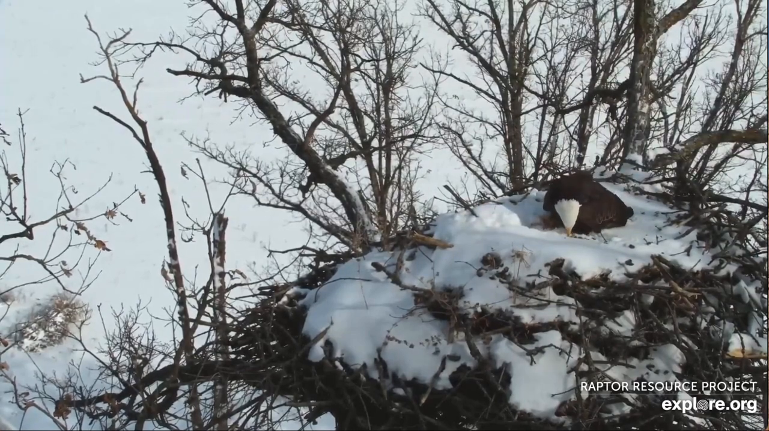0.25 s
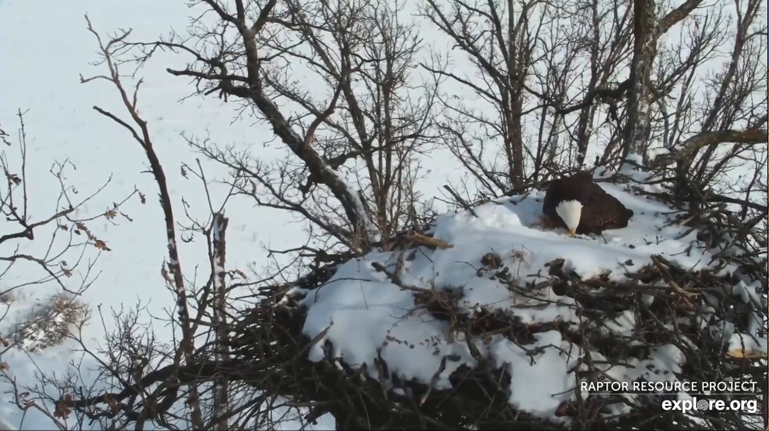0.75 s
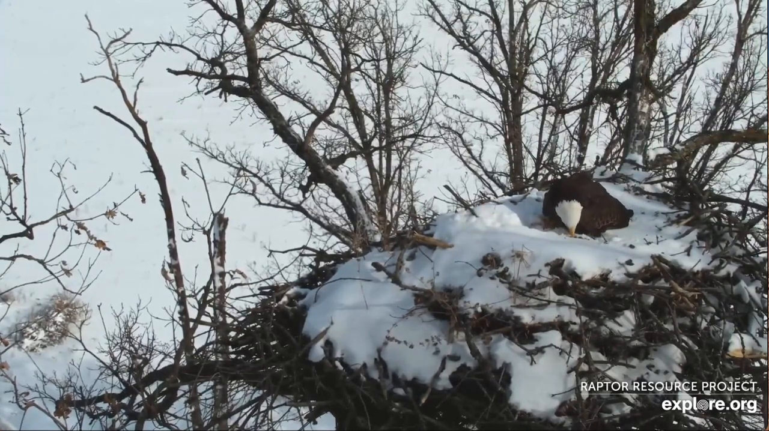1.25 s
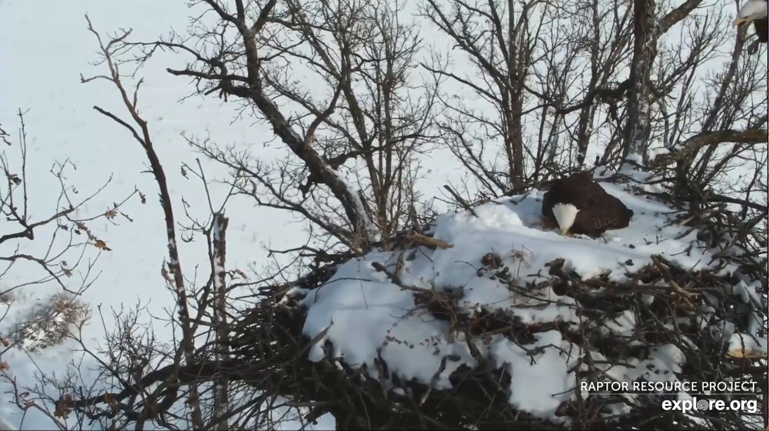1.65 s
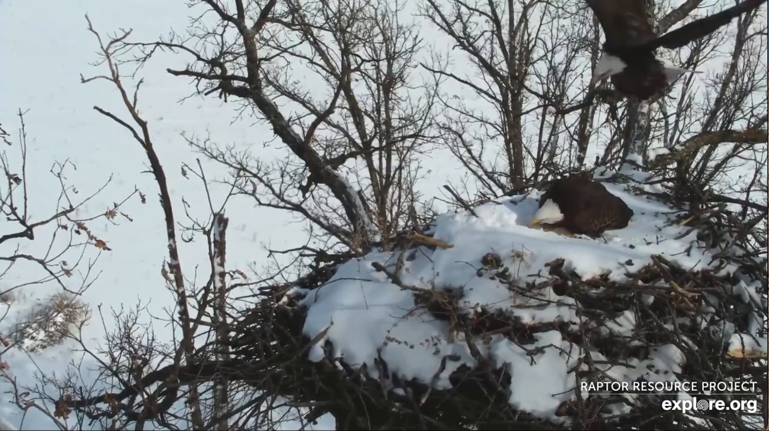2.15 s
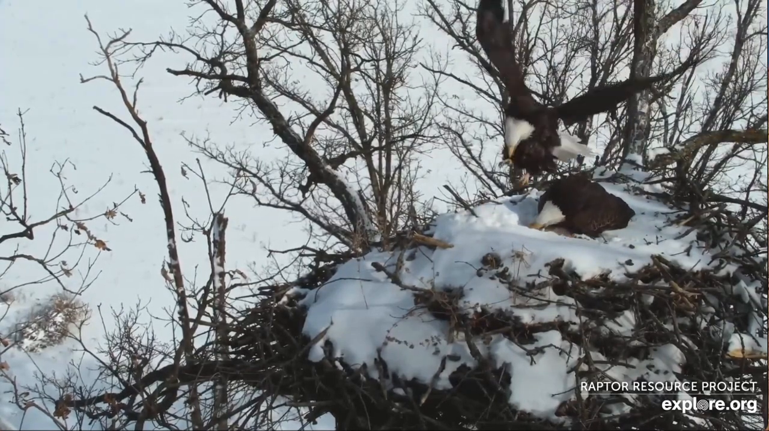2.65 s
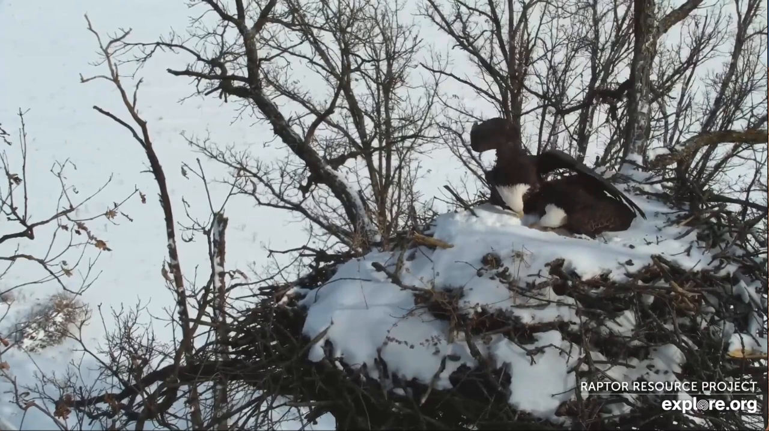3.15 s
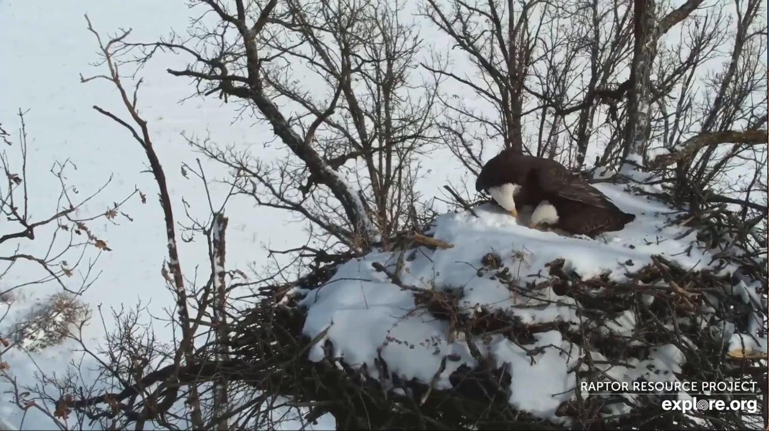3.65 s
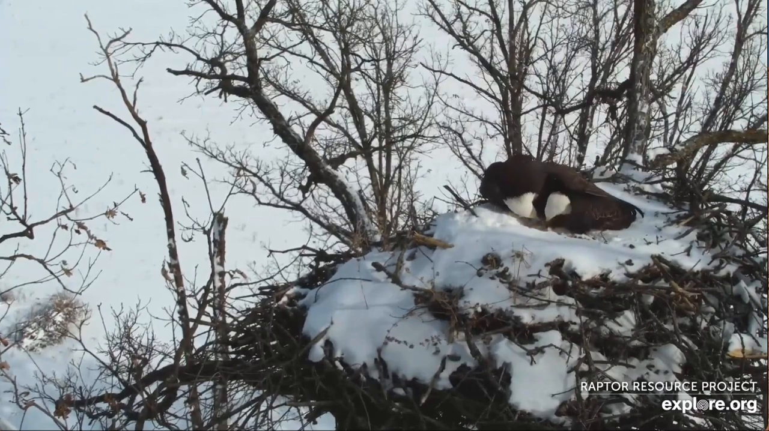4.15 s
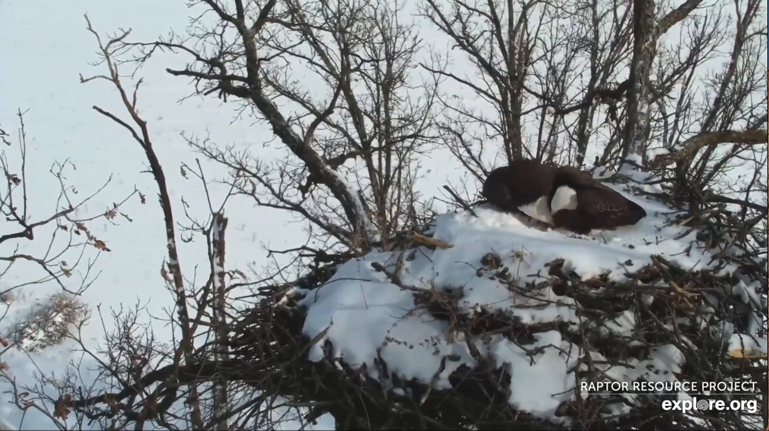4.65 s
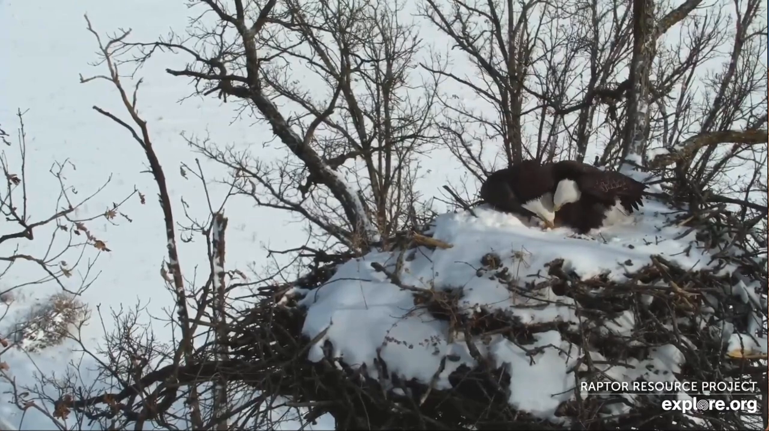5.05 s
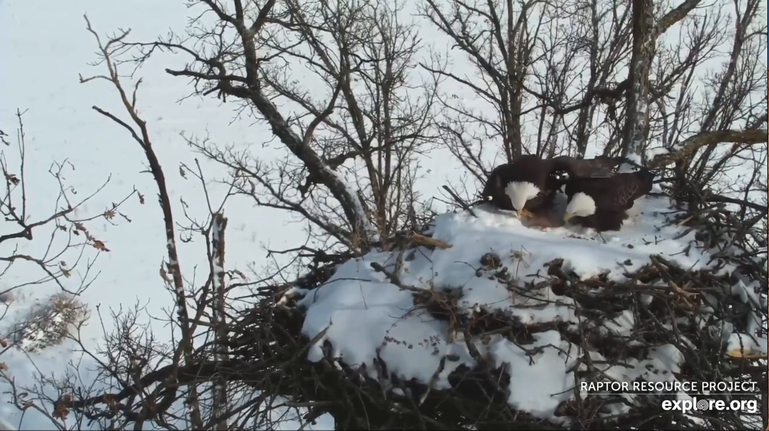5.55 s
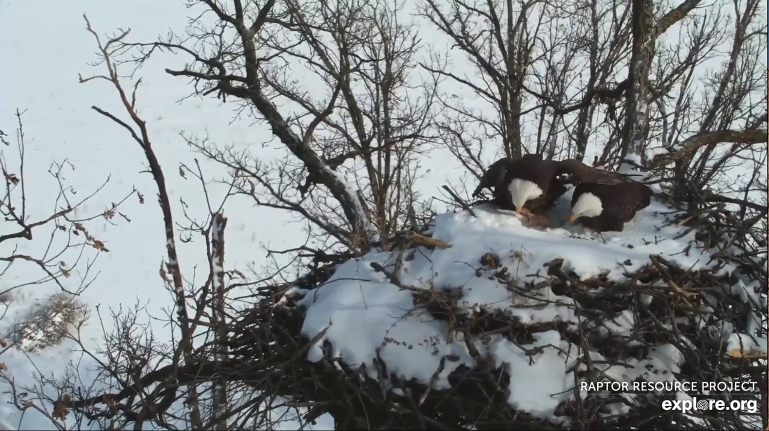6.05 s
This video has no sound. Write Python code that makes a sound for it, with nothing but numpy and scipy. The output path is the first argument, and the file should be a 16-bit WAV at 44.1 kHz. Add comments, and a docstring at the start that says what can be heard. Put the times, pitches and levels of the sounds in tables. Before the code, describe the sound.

Two eagles call outdoors, very close to the microphone. One gives high piping notes and three loud, wavering screams that distort with a rasp, while its mate holds softer, lower whistles underneath. The sound cuts out for an instant, then a yodelling scream follows. The calls ease into rising cries, a thin squeal and a last reedy whistle. Wind rumbles low throughout, and the trees give a faint echo.

```python
"""Piping notes and wavering screams ring out very close by: two eagles at their nest, in a low wind. Each voice
is a nearly pure oscillation whose harmonics the throat filters. The leader breaks between registers; its mate
holds softer rising whistles. The loudest notes overload the microphone, whose nonlinearity adds rasp, bluster
and combination tones, and the sound cuts out once. Trees echo faintly, a faint high tick and a brief thin burst
sound, and a low hum swells near the end."""
import sys
import numpy as np
from scipy import signal
from scipy.fft import rfft, irfft
from scipy.io import wavfile
from scipy.ndimage import uniform_filter1d, map_coordinates

SR = 44100
rng = np.random.default_rng(int(sys.argv[2]) if len(sys.argv) > 2 else 0)


def unload_wav(signal):
    """Save mono or channel-first audio to the path in sys.argv[1] as 16-bit WAV at rate SR, clipped to [-1, 1]."""
    wavfile.write(
        sys.argv[1],
        SR,
        np.round(np.clip(np.atleast_2d(signal).T, -1, 1) * 32767).astype(np.int16),
    )


N = 277830
T = np.arange(N) / SR
BAND_LIMIT_HZ = 15886


def gain_of(db):
    """Amplitude ratio of a level in decibels."""
    return 10 ** (np.asarray(db) / 20)


def unit_rms(x):
    """Normalisation to unit power."""
    return x / np.sqrt(np.mean(x ** 2) + 1e-20)


def value_at(curve, hz):
    """Interpolation along a logarithmic frequency axis."""
    curve_hz, value = np.transpose(curve)
    return np.interp(np.log(hz + 1), np.log(curve_hz + 1), value)


def add(mix, start_s, sound):
    """Superposition of a sound on the mix."""
    part = mix[max(round(start_s * SR), 0):][:len(sound)]
    part += sound[:len(part)]


def noise(magnitude):
    """Spectral shaping: white noise weighted by magnitude(hz), at unit power."""
    return unit_rms(irfft(rfft(rng.standard_normal(N)) * magnitude(np.fft.rfftfreq(N, 1 / SR)), N))


def drift(t, hz):
    """Smooth random modulation of about unit size, with a bandwidth of about hz."""
    steps = rng.standard_normal(8192)
    return map_coordinates(steps, [2 * hz * t], order=2, mode="wrap")


# Spectrum of wind on the microphone: frequency_hz, relative_db
WIND_SPECTRUM = [(20, -31), (45, -9), (85, 3), (140, -1.5), (300, -6), (600, -17.5), (2500, -47),
                 (7000, -56), (15000, -52.5)]

def wind(level_db=-23.0, gust_db=0.94):
    """Turbulent pressure fluctuation: a lumpy rumble with a faint hiss above it."""
    level = gain_of(level_db + gust_db * drift(T, 5.2))
    return level * noise(lambda hz: gain_of(value_at(WIND_SPECTRUM, hz)))


# Envelope of a hum that swells twice: time_s, level_db
HUM_ENVELOPE = [(4.9, -40), (5.35, -16.5), (5.62, -32.5), (6.3, -17.5)]

def hum(pitch_hz=72, octave_db=-12):
    """Slow frequency and amplitude modulation make a low tone and its octave waver."""
    phase = 2 * np.pi * np.cumsum(pitch_hz * (1 + 0.0321 * drift(T, 10))) / SR
    level = gain_of(np.interp(T, *np.transpose(HUM_ENVELOPE)) + 1.6 * drift(T, 13))
    return np.sqrt(2) * level * (np.sin(phase) + gain_of(octave_db) * np.sin(2 * phase))


# A faint high tick and a brief thin burst near 12 kHz: start_s, level_db, pitch_hz, width_hz, decay_s
HIGH_TICKS = [(2.856, -37, 9000, 4000, .0015), (3.332, -29.5, 11900, 490, 0.0044)]

def high_ticks():
    """Damped transients: each is a band of noise that swells and dies at once."""
    out, t = np.zeros(N), T[:2048]
    for start_s, level_db, pitch_hz, width_hz, decay_s in HIGH_TICKS:
        envelope = gain_of(level_db) * t / decay_s * np.exp(1 - t / decay_s)
        add(out, start_s, envelope * unit_rms(drift(t, width_hz)) * np.cos(2 * np.pi * pitch_hz * t))
    return out


def woods(sound, low_t60_s=0.49, high_t60_s=.4, smear=.8, smear_hz=110):
    """Scattering by trunks and branches: thin echoes, blurred in pitch, whose treble dies first."""
    reflections = rng.standard_normal(SR) * (rng.random(SR) < 2000 / SR)
    hz, t, spectrum = signal.stft(reflections, SR, nperseg=256)
    t60_s = value_at([(3000, low_t60_s), (9000, high_t60_s)], hz)[:, None]
    tail = signal.istft(spectrum * gain_of(-60 * t / t60_s), SR, nperseg=256)[1]
    tail = signal.lfilter(*signal.butter(1, 6000, fs=SR), tail)
    blurred = sound * unit_rms(1 - smear + smear * drift(T, smear_hz))
    return signal.fftconvolve(blurred, tail / np.linalg.norm(tail))[:N]


# Spells in which the screams overload the microphone: start_s, end_s, drive_db, end_drive_db
OVERLOAD_SPELLS = [(0.072, 0.087, -50.5, -24), (0.224, 0.397, -29, -15), (0.734, 1.111, -19, -14.5),
                   (1.364, 1.95, -14.5, -11), (2.242, 2.75, -20.5, -11)]

def overload(t, ramp_s=0.0086):
    """Overdrive: how far the microphone is pushed past its linear range at the times t."""
    return sum(np.interp(t, [start - ramp_s, start, end, end + ramp_s],
                         [0, gain_of(db), gain_of(end_db), 0])
               for start, end, db, end_db in OVERLOAD_SPELLS)


def bluster(thump_db=-10, corner_hz=120, slope=1.92, sizzle_db=-22, wing_db=-22):
    """Modulation noise: the overdriven microphone heaves and sizzles; a settling wing buffets it once."""
    drive = abs(uniform_filter1d(overload(T), 400))
    heave = noise(lambda hz: 1 / (1 + (hz / corner_hz) ** slope))
    heave *= gain_of(6.9 * np.tanh(drift(T, 20)))
    sizzle = rng.standard_normal(N) * gain_of(1.6 * drift(T, 47))
    wing = gain_of(wing_db) * np.exp(-((T - 3.65) / 0.21) ** 2)
    return (gain_of(thump_db) * np.sqrt(drive) + wing) * heave + gain_of(sizzle_db) * drive * sizzle


def combination_tones(first, second, growl_db=8, grit_db=7, thump_db=-4, sum_db=-10):
    """Asymmetric response: two tones yield their difference, its octave and their sum; call ends thump."""
    def band(x, edges_hz):
        return signal.sosfilt(signal.butter(3, edges_hz, "band", fs=SR, output="sos"), x)
    square = (first + second) ** 2
    thump = gain_of(thump_db) * band(square, [12, 250])
    growl = gain_of(growl_db) * band(square, [350, 1100])
    sum_tone = gain_of(sum_db) * band(square, [3050, 3550])
    difference = signal.hilbert(first) * np.conj(signal.hilbert(second))
    difference_octave = abs(difference) * np.cos(2 * np.angle(difference))
    grit = gain_of(grit_db) * band(difference_octave, [1100, 2100])
    drive = abs(uniform_filter1d(overload(T), 400))
    return np.sqrt(drive) * (growl + grit) + thump + sum_tone


# Spectrum of the overload's harmonics: frequency_hz, relative_db
RASP_SPECTRUM = [(3800, -1.5), (5400, -28.5), (6800, -14.5), (8500, -6), (14000, -7)]

def rasp(t, hz, phase, folded_db=-27, shake=0.084, patchy_db=6.5, grain=0.17):
    """Harmonic distortion adds grainy overtones; the highest alias into faint, contrary glides."""
    out = np.zeros(len(t))
    phase = phase + shake * gain_of(patchy_db * drift(t, 14)) * drift(t, 280)
    for k in range(2, 16):
        folded = np.clip((k * hz - BAND_LIMIT_HZ) / (SR / 2 - BAND_LIMIT_HZ), 0, 1)
        flutter_db = 0.7544 * min(k, 6) * drift(t, 75)
        level_db = value_at(RASP_SPECTRUM, k * hz) + folded_db * folded + flutter_db
        out += gain_of(level_db) * (1 + grain * drift(t, 600)) * np.sin(k * phase)
    return out * uniform_filter1d(overload(t), 150)


# Spells in which a voice flutters: centre_s, half_length_s, depth_ratio
FLUTTER_SPELLS = [(4.98, 0.046, 0.53)]

def flutter(t, rate_hz=74.4):
    """Fast random modulation under a Gaussian envelope makes a voice tremble briefly."""
    envelope = sum(depth * np.exp(-((t - centre_s) / half_s) ** 2)
                   for centre_s, half_s, depth in FLUTTER_SPELLS)
    return envelope * drift(t, rate_hz)


# Spells in which a voice turns hoarse: centre_s, half_length_s, depth_ratio, cycles_per_group
CROAK_SPELLS = [(1.39, .018, 0.55, 5), (1.489, .014, 0.35, 3.6), (5.02, 0.033, 0.55, 2.9),
                (5.29, 0.15, 0.07, 1.7), (5.918, .012, .7, 1.7), (6.15, .22, 0.09, 3.2)]

def croak(t, phase):
    """Subharmonic modulation: uneven groups of cycles put spectral lines between the harmonics."""
    return sum(depth * np.exp(-((t - centre_s) / half_s) ** 2) * np.sin(phase / cycles + drift(t, 90))
               for centre_s, half_s, depth, cycles in CROAK_SPELLS)


def glide(start_s, end_s, pitch_hz, end_pitch_hz, level_db, end_level_db):
    """A linear sweep, given by its two end points."""
    return [(start_s, pitch_hz, level_db), (end_s, end_pitch_hz, end_level_db)]


def contour(points, fall_oct_per_s, attack_s, register_gap_hz,
            release_s=0.0082, fall_s=0.032, register_hold_s=.013, fall_db=-25):
    """Pitch, envelope and instability of a note: the oscillation cracks at onset and may collapse."""
    times_s, hz, db = np.transpose(points)
    start = times_s[0] - attack_s / 2
    end = times_s[-1] + (release_s if fall_oct_per_s is None else fall_s)
    t = T[(T >= start) & (T <= end)]
    pitch = np.interp(t, times_s, hz)
    level = np.interp(t, times_s, gain_of(db))
    level *= np.clip((t - start) / attack_s, 0, 1) * np.clip((end - t) / release_s, 0, 1)
    onset_crack = np.exp(-((t - times_s[0]) / 0.0084) ** 2)
    end_crack = np.exp(-((t - times_s[-1]) / 0.0042) ** 2)
    breaking = np.maximum(onset_crack, end_crack)
    if fall_oct_per_s is not None:
        after_s = np.maximum(t - times_s[-1], 0)
        stumble_octaves = 0.02 * np.sqrt(after_s / fall_s) * drift(t, 150)
        # given a register gap, the voice also trips down in steps
        register_hz = np.maximum(pitch - register_gap_hz * np.round(after_s / register_hold_s), pitch / 2)
        pitch = register_hz * 2 ** (-fall_oct_per_s * after_s + stumble_octaves)
        level *= gain_of(fall_db * (after_s / fall_s) ** 2)
        breaking = np.where(after_s > 0, .7, breaking)
    return t, pitch, level, breaking


def call(points, throat, jitter, waver_db, breath_db, hoarse, fall_oct_per_s=None, attack_s=0.0053,
         bright_db=0, overloads=False, register_gap_hz=0, beat_hz=560, top_register_hz=3515):
    """Source and filter: a nearly pure tone whose overtones the throat shapes. Returns start_s, sound."""
    t, hz, level, breaking = contour(points, fall_oct_per_s, attack_s, register_gap_hz)
    breaking = hoarse * breaking
    hz = hz * (1 + jitter * drift(t, 70) + .0035 * drift(t, 16))
    tremble = flutter(t)
    # turbulent air shakes both the phase and the amplitude of the vibration
    rough = gain_of(breath_db + 2 * np.tanh(drift(t, 13))) + 0.14 * breaking
    phase = 2 * np.pi * np.cumsum(hz) / SR + rough * drift(t, 500) + tremble / 2
    limp = hoarse * croak(t, phase)
    phase += limp
    # at a break two registers sound at once and beat against each other
    beat = breaking * np.sin(2 * np.pi * np.cumsum(beat_hz * (1 + 0.22 * drift(t, 40))) / SR)
    level *= gain_of(waver_db * drift(t, 25))
    level *= 1 + limp + tremble + rough * drift(t, 900) + 0.5 * beat
    squash_db = 31 * overload(t)  # overload flattens the voice's own high overtones
    out = np.cos(phase)
    for k in range(2, 11):
        throat_db = value_at(throat, k * hz) - value_at(throat, hz)
        shimmer_db = 2 * drift(t, 12) + 2.2 * drift(t, 110)
        reedy_db = bright_db * (k > 3) + 5 * (k == 2) * (hz > top_register_hz)
        harmonic_db = throat_db + reedy_db + shimmer_db - squash_db * (k * hz > 4930)
        out += gain_of(harmonic_db) * (k * hz < BAND_LIMIT_HZ) * np.sin(k * phase)
    out *= level
    if overloads:
        sounding = np.minimum(0.89 * level / np.median(level), 1) ** 2
        out += sounding * rasp(t, hz, phase + 0.24 * beat)
    return t[0], np.sqrt(2) * out


# Frequency response of the mate's throat: frequency_hz, gain_db
MATE_RESPONSE = [(1300, 6.5), (2750, -2.5), (3600, -4.5), (4100, -19.5), (6800, -26), (8200, -38.5),
                 (9500, -31.5), (12300, -48.5), (14000, -62)]
# Straight whistles: start_s, end_s, pitch_hz, end_pitch_hz, level_db, end_level_db, fall_oct_per_s
MATE_WHISTLES = [(0, 0.403, 1174, 1157, -26.5, -37, 14.5), (0.408, 0.927, 1160, 1286, -23.5, -23, -1),
                 (1.255, 1.474, 1825, 1920, -22.5, -23, 9.5), (1.479, 1.955, 1926, 1998, -30.5, -46.5, 5),
                 (1.959, 1.987, 1956, 1900, -23.5, -21, 2.5), (2.475, 2.773, 1860, 2022, -28.5, -48, 7),
                 (2.78, 3.103, 1956, 2153, -26, -25.5, -1.5), (3.329, 3.352, 1993, 1890, -22, -22, 10.5),
                 (3.664, 4.107, 1375, 1563, -34, -25.5, -0.5)]
# Its two closing whistles, one fluttering, one reedy: time_s, pitch_hz, level_db
MATE_FLUTTERING = [(4.785, 1259, -27.5), (4.965, 1312, -26), (5.06, 1326, -21), (5.38, 1420, -20.5),
                   (5.43, 1386, -20.5)]
MATE_REEDY = [(5.92, 1324, -17.5), (5.948, 1397, -17), (6.034, 1312, -19), (6.15, 1360, -16),
              (6.252, 1364, -12), (6.3, 1363, -14)]

def mate():
    """Sustained oscillation: soft, breathy whistles, most rising; the last is strongest and reediest."""
    out = np.zeros(N)
    for *row, fall in MATE_WHISTLES:
        add(out, *call(glide(*row), MATE_RESPONSE, jitter=0.0049, waver_db=1.5, breath_db=-22.0,
                       hoarse=.1, fall_oct_per_s=fall, attack_s=0.008, bright_db=-0.5))
    add(out, *call(MATE_FLUTTERING, MATE_RESPONSE, jitter=0.0046, waver_db=1.0, breath_db=-21.0,
                   hoarse=0.065, fall_oct_per_s=8.5, attack_s=.02))
    add(out, *call(MATE_REEDY, MATE_RESPONSE, jitter=0.0035, waver_db=-0.5, breath_db=-30.0,
                   hoarse=0.3, attack_s=0.009, bright_db=4.0))
    return out


# The leader's second oscillator: start_s, end_s, pitch_hz, end_pitch_hz, level_db, end_level_db
SECOND_OSCILLATOR = [(2.259, 2.27, 2883, 2752, -12, -5), (2.618, 2.643, 2570, 2510, -13, -15),
                     (3.808, 3.991, 3056, 3120, -34.5, -30), (4.102, 4.26, 3014, 3028, -27.5, -27)]

def biphonation(voice, throat, depth=0.084, saturation_db=-26):
    """Coupled oscillators: a second tone sounds by itself and modulates the voice into rough sidebands."""
    second = np.zeros(N)
    for row in SECOND_OSCILLATOR:
        add(second, *call(glide(*row), throat, jitter=0.0078, waver_db=4.0, breath_db=-14.5, hoarse=1))
    return voice * (1 + depth * np.tanh(second / gain_of(saturation_db))) + second


# Frequency response of the leader's throat: frequency_hz, gain_db
LEADER_RESPONSE = [(1300, 5.5), (2100, 1.5), (2800, -8), (3700, -4.5), (4400, -16), (5600, -22),
                   (7500, -34.5), (8500, -34.5), (11000, -49.5), (14500, -68)]
# Short notes in one register each: start_s, end_s, pitch_hz, end_pitch_hz, level_db, end_level_db
PIPING_NOTES = [(0, 0.032, 2710, 2525, -13.5, -30.5), (0.036, 0.092, 2302, 2480, -14, -9.5),
                (0.638, 0.652, 1290, 1240, -14.5, -17.5), (0.648, 0.661, 1862, 1915, -26.5, -11),
                (0.665, 0.706, 2770, 2606, -13, -16), (0.712, 0.773, 2353, 2454, -8, -7.5),
                (1.372, 1.401, 2306, 2380, -10, -8), (1.402, 1.478, 1921, 2028, -9.5, -10.5),
                (2.165, 2.179, 1670, 1840, -21.5, -9), (2.613, 2.676, 2053, 2130, -12, -1),
                (2.992, 3.019, 1177, 1326, -21.5, -15.5), (4.002, 4.102, 2870, 2895, -16.5, -20.5),
                (4.11, 4.248, 3537, 3410, -21, -27), (4.256, 4.272, 2930, 2410, -22.5, -24.5),
                (4.586, 4.614, 1110, 1210, -32.5, -26)]
# Loud wavering screams and softer rising cries, one curve a note: time_s, pitch_hz, level_db
LOUD_SCREAMS = [
    [(0.095, 2725, -16.5), (0.185, 2807, -9), (0.215, 2840, -20.5), (0.232, 2770, -7), (0.275, 2756, -9.5),
     (0.381, 2981, -7), (0.408, 2800, -11)],
    [(0.779, 2700, -9.5), (0.809, 2826, -7), (0.881, 2852, -7.5), (0.899, 2736, -7), (0.952, 2740, -6),
     (0.963, 2826, -9.5), (1.027, 2940, -7.5), (1.087, 2995, -8.5), (1.101, 2833, -5)],
    [(1.474, 2737, -7), (1.546, 2820, -7), (1.56, 2547, -7.5), (1.614, 2710, -7.5), (1.632, 2644, -7),
     (1.69, 2910, -7), (1.755, 2920, -6.5), (1.772, 2850, -7), (1.792, 2653, -7), (1.86, 2710, -6.5),
     (1.922, 2813, -7), (1.938, 2820, -5)],
]
RISING_CRIES = [
    [(3.025, 1912, -12), (3.075, 1879, -16), (3.309, 1947, -13), (3.345, 2012, -11.5), (3.549, 2108, -13),
     (3.686, 2148, -12)],
    [(4.616, 1833, -30), (4.635, 1771, -22.5), (4.67, 1757, -24.5), (4.72, 1833, -24.5), (4.84, 1857, -25),
     (4.885, 1820, -28.5), (4.962, 1924, -26.5), (4.995, 1963, -32), (5.04, 1940, -25.5)],
    [(5.046, 1886, -24), (5.124, 1944, -15.5), (5.19, 1989, -18), (5.28, 2100, -11.5), (5.42, 2240, -14),
     (5.49, 2167, -12), (5.508, 1914, -24.5)],
]
# A yodel, whose low scream flips up to a peak and then droops: time_s, pitch_hz, level_db
YODEL_SCREAM = [(2.238, 1853, -5.5), (2.259, 1963, -13), (2.303, 1851, -4.5), (2.328, 1824, -11.5),
                (2.41, 1910, -10), (2.46, 2063, -4.5)]
YODEL_PEAK = [(2.465, 2586, -6), (2.505, 2640, -8), (2.534, 3320, -9.5), (2.543, 4000, -22),
              (2.555, 3221, -8), (2.583, 2645, -9), (2.619, 2621, -5)]
YODEL_DROOP = [(2.681, 2752, -6.5), (2.722, 2730, -6), (2.753, 2330, -7.5)]
# A thin top-register squeal: time_s, pitch_hz, level_db
THIN_SQUEAL = [(3.692, 3610, -18.5), (3.757, 3690, -17.5), (3.844, 3510, -15), (3.962, 3560, -25.5),
               (3.997, 3420, -21.5)]

def leader(pause_s=.1, collapse_oct_per_s=9):
    """Register breaks: the voice jumps between modes of vibration and collapses before each pause."""
    out = np.zeros(N)
    notes = [glide(*row) for row in PIPING_NOTES]
    notes += [*LOUD_SCREAMS, YODEL_SCREAM, YODEL_PEAK, YODEL_DROOP, *RISING_CRIES, THIN_SQUEAL]
    notes.sort(key=lambda note: note[0][0])
    next_starts = [note[0][0] for note in notes[1:]] + [np.inf]
    for note, next_start in zip(notes, next_starts):
        start, end = note[0][0], note[-1][0]
        fall = collapse_oct_per_s if next_start - end > pause_s else None
        if overload((start + end) / 2) > 0:
            timbre = dict(jitter=.0042, waver_db=0.5, breath_db=-40.5, hoarse=0.67, overloads=True)
        else:
            timbre = dict(jitter=0.0031, waver_db=1.0, breath_db=-29.0, hoarse=0.73,
                          bright_db=5 if note is RISING_CRIES[0] else 0)
        add(out, *call(note, LEADER_RESPONSE, fall_oct_per_s=fall, register_gap_hz=300, **timbre))
    return biphonation(out, LEADER_RESPONSE)


def scene(shaking=0.44, echo_db=-23.5):
    """Superposition at one microphone; the rumble modulates the calls and makes them grainy."""
    leading, answering = leader(), mate()
    birds, rumble = leading + answering, wind() + hum()
    mix = birds * (1 + shaking * rumble) + combination_tones(leading, answering)
    mix += gain_of(echo_db) * woods(birds) + rumble + bluster() + high_ticks()
    return np.array([mix, mix])


def record(dry, ceiling=.95, cut_s=2.178, resume_s=2.236, fade_s=.022):
    """Hard clipping flattens the peaks; the sound cuts out and fades back; a low-pass limits the band."""
    gate = np.where(T < cut_s, 1, np.clip((T - resume_s) / fade_s, .0005, 1))
    clipped = np.clip(dry, -ceiling, ceiling)
    low_pass = signal.firwin(511, BAND_LIMIT_HZ, window=("kaiser", 9), fs=SR)
    return signal.oaconvolve(clipped * gate, low_pass[None], "same")


dry = scene()
out = record(dry)
unload_wav(out)
```